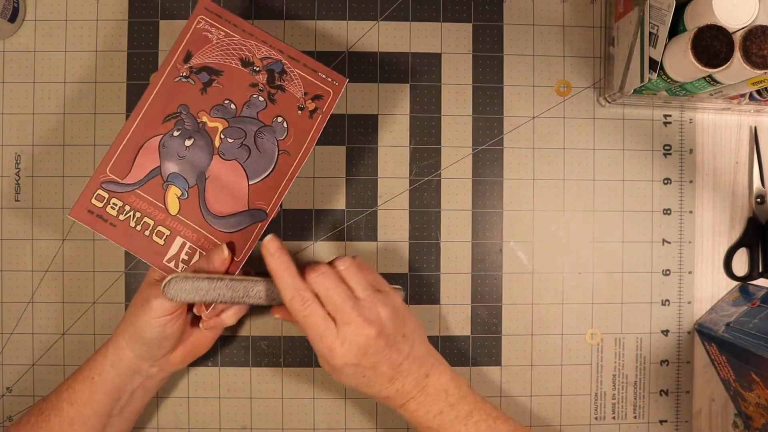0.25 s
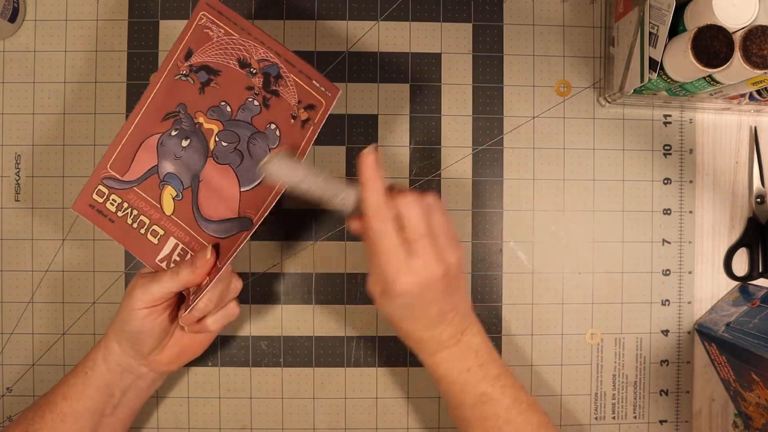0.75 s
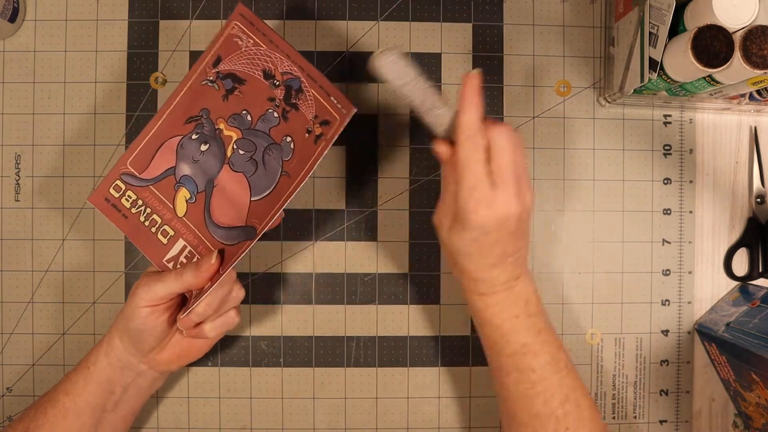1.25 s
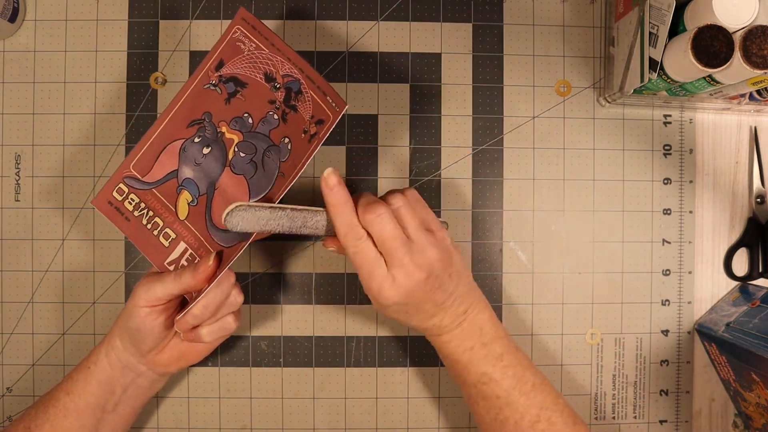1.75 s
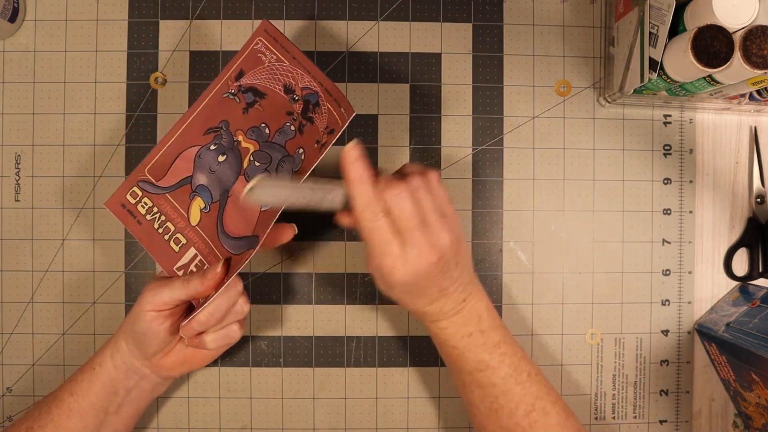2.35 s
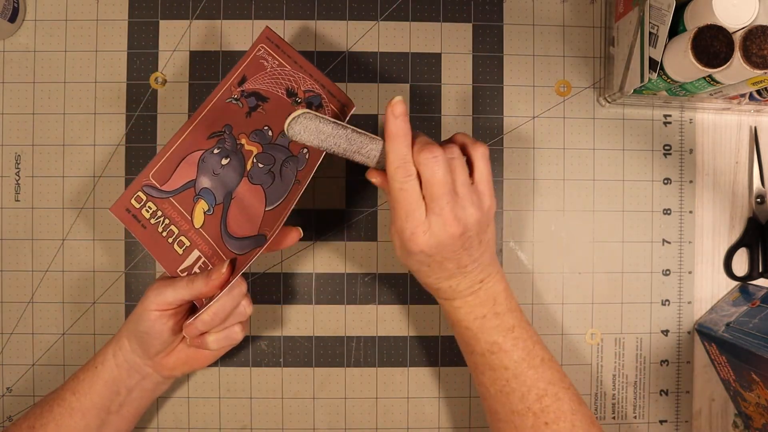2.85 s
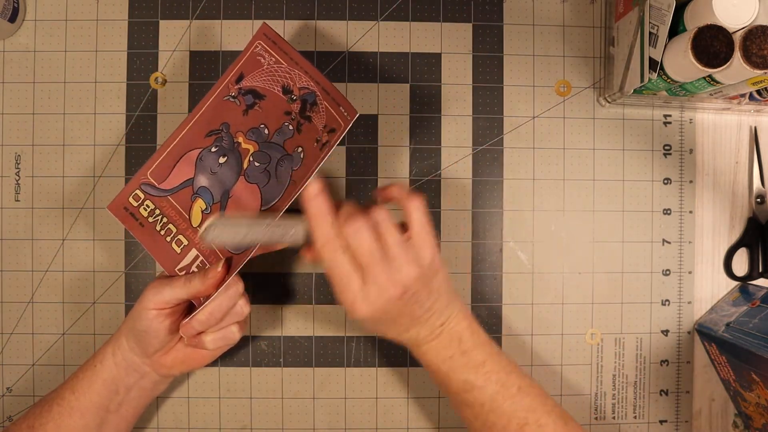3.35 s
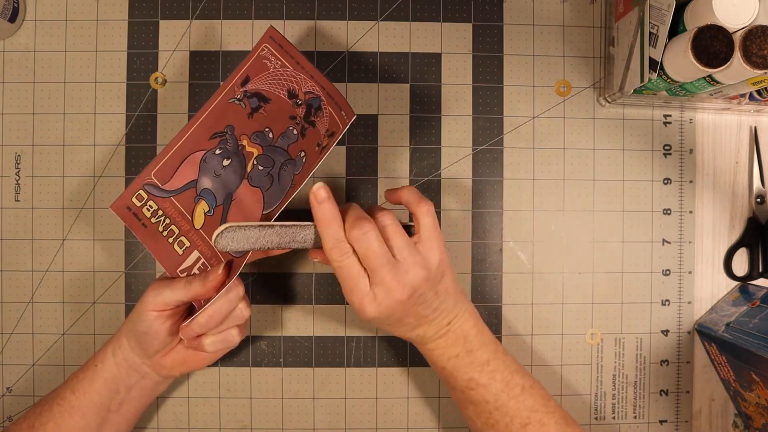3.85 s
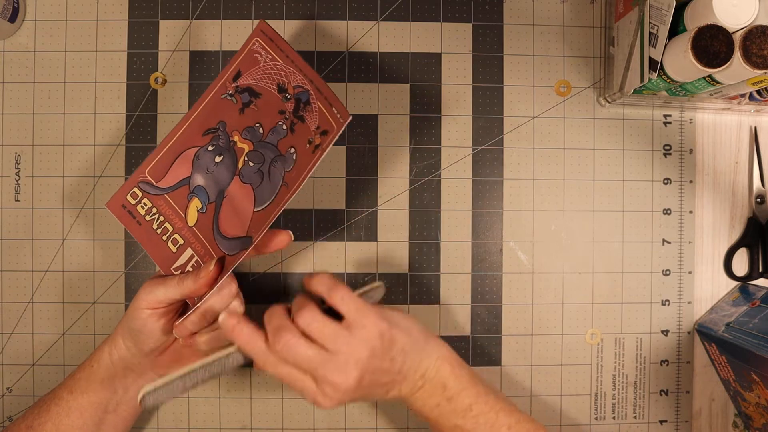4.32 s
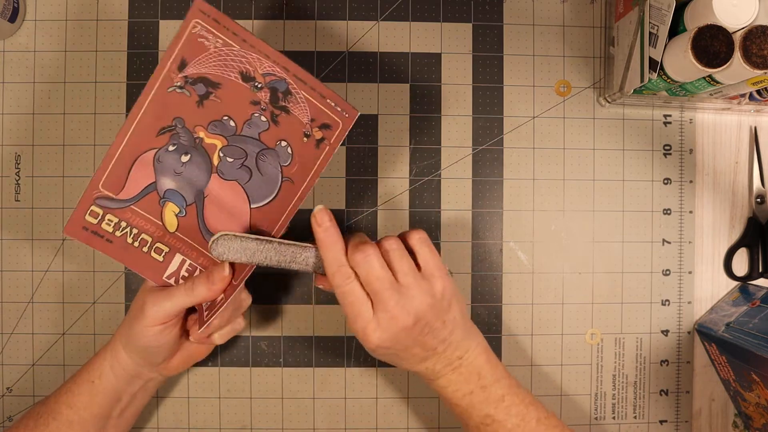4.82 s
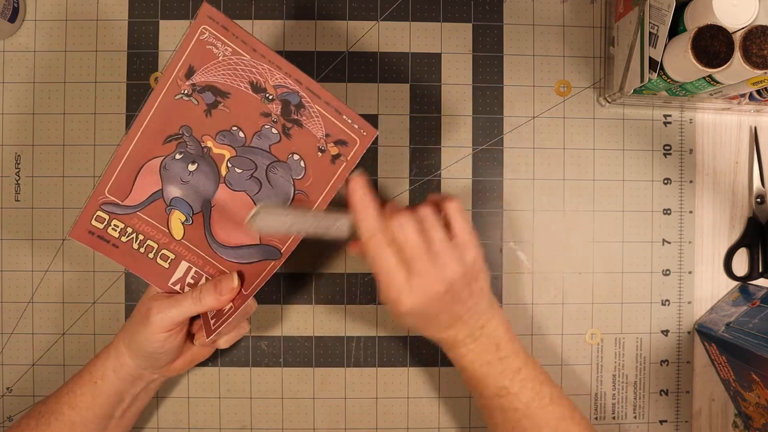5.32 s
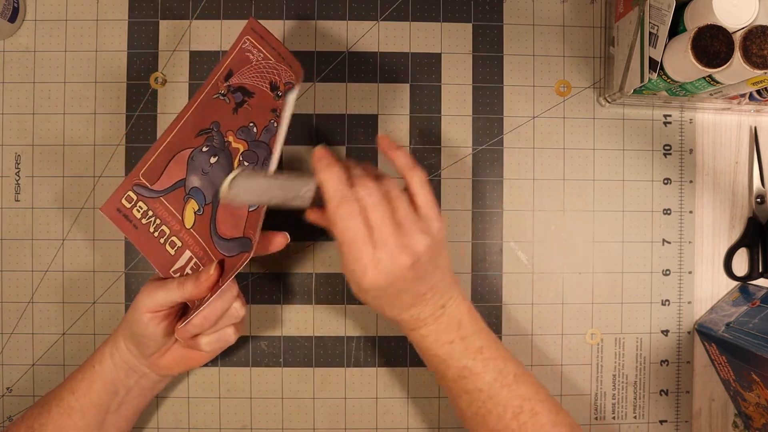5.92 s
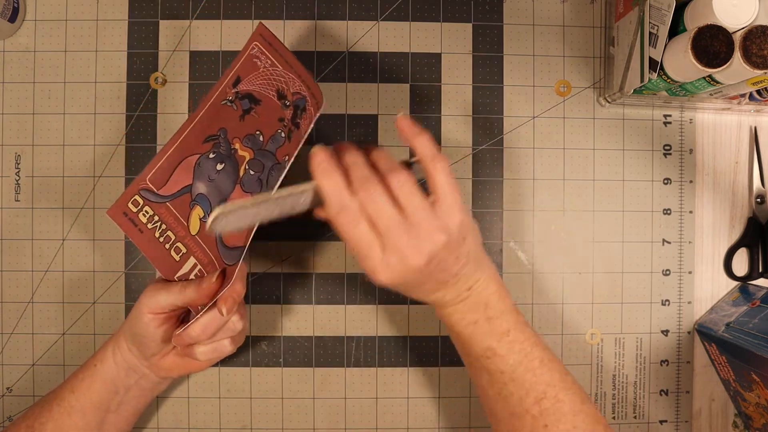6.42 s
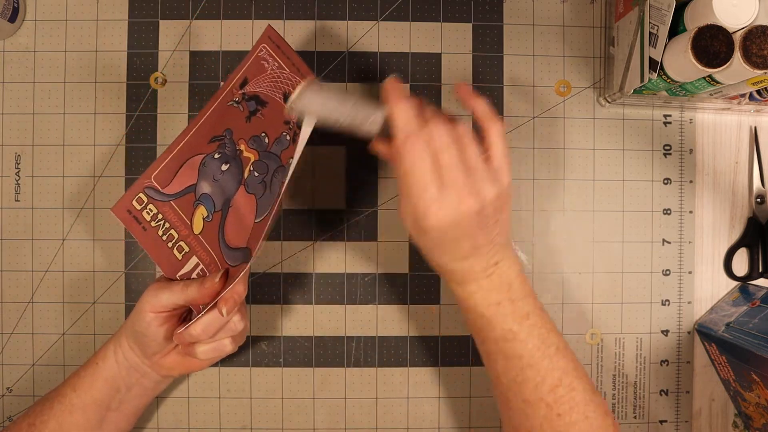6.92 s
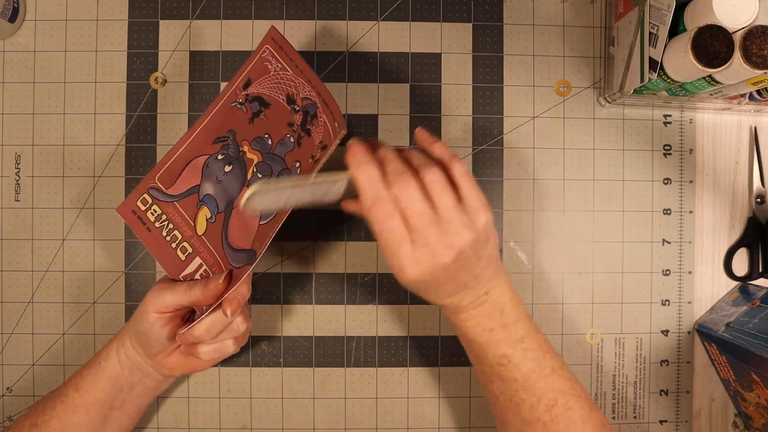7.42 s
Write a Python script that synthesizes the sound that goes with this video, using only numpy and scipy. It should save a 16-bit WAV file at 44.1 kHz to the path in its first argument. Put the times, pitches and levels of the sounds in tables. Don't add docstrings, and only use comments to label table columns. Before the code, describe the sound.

Very close, bright stereo sound of a nail file on the cut edge of a hand-held paper booklet, in a quiet, fairly dry room with faint hiss. A light papery knock at 0.05 seconds leads to soft grazing, then coarse scrapes from 0.4, one with a thin high squeak. A sharp snap lands at 0.9, another rasp at 1.1, and a softer knock at 1.3. From 1.55 to about 4.4 the file scrubs rapidly to and fro, gritty and hollow, quickening to roughly ten short strokes a second after 3.7. A half-second lull follows. At 4.9 a long rasp resumes, with knocks at 5.1 and 5.35 and a hard clack at 5.5. Slower, uneven strokes run from 5.7 to 7.0, ending in a loud slip-off slap and page flutter. After a pause, a light knock and short scrape come at 7.5.

```python
import sys
import numpy as np
from scipy import signal
from scipy.fft import rfft, irfft, next_fast_len
from scipy.io import wavfile

SR = 44100
rng = np.random.default_rng(int(sys.argv[2]) if len(sys.argv) > 2 else 0)


def dump(signal):
    limited = np.clip(np.atleast_2d(signal).T, -1, 1)
    pcm = np.round(limited * 32767).astype(np.int16)
    wavfile.write(sys.argv[1], SR, pcm)


N = 338247

# start in seconds, length in seconds, # early
# force in dB, late force in dB, cover flex in dB relative to the force.
STROKES = [(-0.02, 0.055, -38.5, -47.5, 11), (0.037, 0.044, -36, -33, 1),
           (0.065, .22, -45, -57.5, -4.5), (0.379, 0.19, -36.5, -27.5, -1.5),
           (0.577, 0.13, -29, -34, 0.5), (0.708, 0.19, -24.5, -21, -6.5),
           (1.138, 0.18, -24.5, -27.5, -4), (4.924, 0.21, -23, -36.5, -4.5),
           (5.36, 0.14, -23.5, -30.5, -7), (5.721, 0.13, -41, -44, 2.5), (5.867, 0.25, -38, -24, -4),
           (6.108, .11, -38.5, -36.5, -1.5), (6.24, 0.18, -39, -48, 2),
           (6.403, 0.23, -24, -25.5, -6.5), (6.667, .2, -29.5, -33, -5.5), (6.871, .163, -26, -21, -7),
           (7.473, 0.12, -31.5, -23, -0.5)]
MORE_STROKES = [(1.55, 0.16, -22, -25.5, -4), (1.718, 0.14, -31, -28, 0), (1.862, 0.11, -25.5, -30, -3),
                (1.967, 0.12, -24.5, -28, -2.5), (2.097, 0.11, -25.5, -30.5, -3),
                (2.2, 0.14, -25, -25, -4.5), (2.351, 0.17, -20.5, -29, -4),
                (2.552, 0.18, -19.5, -25.5, -5), (2.725, 0.21, -27, -20.5, -5),
                (2.95, 0.2, -23, -26, -5.5), (3.155, 0.18, -23.5, -23, -5), (3.346, 0.17, -25, -22, -6),
                (3.528, 0.14, -21.5, -25.5, -8.5), (3.67, 0.096, -20, -21.5, -6.5),
                (3.77, .092, -26, -24.5, -6), (3.86, 0.098, -23.5, -20.5, -4),
                (3.96, 0.09, -25.5, -25, -9), (4.05, 0.096, -20, -20, -6.5),
                (4.148, 0.087, -26, -27, -8.5), (4.236, 0.13, -18.5, -22.5, -8)]
SETTLES = [
    (1.317, 0.06, -49, -52, 6),
    (7.04, 0.075, -36, -52.5, 9),
]
# time in seconds, bite in dB.
FILE_ANGLE = [(0, 9), (.3, 0), (1.2, 1), (1.9, -2), (2.4, 3), (2.65, -2), (3.3, -0.5), (4.0, -2.5),
              (4.35, 1), (4.97, -3), (5.07, 15), (5.13, -9.5), (5.45, 7), (5.8, -2), (6.3, -2.5),
              (6.6, 0.5), (7.0, 0.5), (7.55, 4)]
# time in seconds, extra scrub in dB, extra flex in dB.
DIGS = [(.467, 9.5, 7), (.775, 4, -2), (.86, 0.5, 12), (1.165, 1, -6.5), (1.568, -1.5, 0.5), (1.615, 1, -5),
        (1.795, 5, 0), (2.02, -2, -4.5), (2.185, -1.5, 1), (2.4, 1.5, -7), (2.66, 5, -4), (2.85, 3, -3.5),
        (2.905, -5.5, 2), (3.18, -3.5, -5), (3.3, 0.5, 2), (3.36, 3, 7.5), (3.93, -3, -1), (3.625, 3, 3),
        (4.98, 4, 2), (5.97, 4.5, 7), (6.085, -1.5, -4.5), (6.195, 6, 11.5), (6.56, 1, 7.5), (6.91, 3, 1.5),
        (6.955, -2, -1.5), (7.012, 10, 4), (7.03, -17.5, 4.5), (7.53, -0.5, 7.5), (7.56, 3, -4.5)]
# frequency in Hz, width in Hz, level in dB.
FLEX_MODES = [(514, 40, -11.5), (683.4, 87.5, -4.5), (862, 230, -8), (1100, 90, 0), (1355, 170, -11.5)]
SCRUB_MODES = [(1590, 166, -1.5), (1853, 157, -1), (2010, 310, -5.5), (2375, 151, 2.5), (2530, 130, 2.5),
               (3130, 262, -6.5), (3477, 100, -5), (3903, 370, -7.5), (4587, 52, -7), (4574, 350, -11.5)]
BITE_MODES = [(5200, 1380, -1.5), (6204, 810, 1.5), (7320, 880, -3.5), (8140, 1200, -3.5),
              (9440, 2000, -6.5), (10860, 2200, -8)]
AIR_MODES = [(12900, 1100, -2), (14000, 1200, 0), (15000, 1000, 4)]
# frequency in Hz, width in Hz, level in dB.
CORNER_MODE = [(5380, 130, 0)]
# time of most song in seconds, level in dB.
CORNER_SONG = [
    (0.465, -24),
    (0.65, -38),
    (0.75, -26),
]
# time in seconds, snap in Hz, snap in dB, crack in dB,
# page stack in dB.
KNOCKS = [(0.051, 1970, -19, -11, -31.5), (0.377, 1650, -51, -23.5, -35.5), (0.899, 1590, -1.5, -10.5, -15),
          (1.133, 2530, -32, -23, -30.5), (1.318, 1590, -10, -32, -19), (1.549, 1720, -13.5, -37, -14),
          (4.872, 1650, -23, -54, -17), (5.139, 2070, -14, -16, -11), (5.351, 2176, -25.5, -16, -22),
          (5.371, 1650, -6.5, -9, -8.5), (5.506, 2090, 1.5, -5.5, -11.5), (5.731, 2020, -28, -54.5, -43.5),
          (7.042, 2180, -6.5, -5, -14), (7.477, 1950, -25, -34, -24.5)]
# frequency in Hz, level in dB, 60 dB decay in seconds.
KNOCK_MODES = [(300, -12, 0.028), (398, -12, 0.024), (713, -2, 0.024), (833, 4, 0.0097), (1130, -9, 0.065),
               (1360, -19.5, 0.0073), (1520, -17.5, 0.042), (2450, -7, 0.0064), (3100, -47, 0.016)]
# time in seconds, level in dB, frequency in Hz.
PUFFS = [
    (0.899, -34.5, 40.2),
    (7.022, -31, 88),
]
# frequency in Hz, width in Hz, level in dB.
PAGE_MODES = [(142, 184, -3), (221, 53, -4.5), (315.5, 59, 13.5), (400, 280, -13)]
# time in seconds, level in dB.
FLAPS = [(.1, -34.5), (.87, -38), (1.32, -35), (1.98, -49), (2.18, -41.5), (2.6, -42.5), (3.01, -46),
         (3.72, -53.5), (4.1, -47.5), (4.31, -52.5), (5.0, -39), (5.12, -39), (5.45, -34.5), (6.07, -47),
         (6.43, -44), (6.58, -38), (7.03, -33)]
# time in seconds, level in dB.
JOLTS = [
    (1.555, -54),
    (4.878, -42),
    (5.356, -35.5),
    (5.51, -30.5),
    (7.48, -32),
]
# delay in seconds, level in dB.
ECHOES = [(.0014, -7), (.0046, -9), (.0066, -6), (.0102, -12), (.0148, -15)]
# frequency in Hz, 60 dB decay in seconds.
ROOM_T60 = [(250, 0.083), (1000, 0.17), (4000, 0.13), (12000, 0.071)]
# frequency in Hz, level in dB.
WIDTH = [(60, -21.5), (110, -5), (200, -10), (380, -15), (700, -17), (1290, -6), (2380, 1), (4400, 3),
         (8120, 8), (15000, 7)]
# frequency in Hz, level in dB per Hz.
FLOOR_MID = [(12, -53.5), (20, -23), (77, -5), (156, -7), (263, -14), (419, -15), (455, -12), (9540, -40),
             (12900, -46), (14000, -42)]
FLOOR_SIDE = [(12, -48), (20, -33), (64, -22), (107, -8), (361, -5), (546, -7), (610, -6), (825, -10),
              (1030, -11), (1640, -13.5), (14500, -35.5)]
# frequency in Hz, level in dB.
MIC = [(20, 1), (120, 0), (11500, 0), (12600, -4), (14900, -6), (15600, -8), (15900, -28)]


def filing(force):
    slips = grit(13000, 2.2)
    flex = gain_of(1.0) * rung(force[0] * slips, FLEX_MODES, drift_db=1.8, drift_hz=9.4)
    scrub = gain_of(-2.5) * rung(force[1] * slips, SCRUB_MODES, drift_db=2.3, drift_hz=11)
    bite = gain_of(-1.0) * rung(force[2] * slips, BITE_MODES, drift_db=1.0, drift_hz=32.0)
    air = gain_of(-16) * rung(force[3] * slips, AIR_MODES, drift_db=3.5, drift_hz=8)
    song = swells(CORNER_SONG, rise_db_per_s=130, fall_db_per_s=150) * np.minimum(force[1] * 30, 1)
    corner = rung(song * slips, CORNER_MODE, drift_db=-3.5, drift_hz=25)
    return passed(flex, 334) + passed(scrub, 770) + passed(bite + corner, 5400) + passed(air, 11500)


def pressure():
    start_s, start_share, start_db = 0.017, 0.084, -25.5
    stop_s, stop_share, stop_db = 0.029, 0.069, -34
    bend = 2.36
    arch_db, flex_arch_db = 1.5, -4.5
    flex_slow = 0.74
    bite_start, bite_slow = 1.8, 2.07
    usual_db, bite_per_db = -24, 0.91
    bite_early_db, bite_late_db, settle_bite_db = -8.5, -7.0, -19
    air_early_db, air_s = 14.0, 0.04
    slip_s, slip_flex_db, slip_bite_db = 0.019, 6.5, 8
    force = np.zeros((4, N))
    for row in STROKES + MORE_STROKES + SETTLES:
        start, length, early_db, late_db, flex_db = row
        t = np.arange(max(-start, 0), length, 1 / SR)
        left = length - t
        rise = start_s + start_share * length
        fall = stop_s + stop_share * length
        slips_off = any(abs(start + length - knock[0]) < .012 for knock in KNOCKS)
        turns = not slips_off
        starting_db = start_db * np.clip(1 - t / rise, 0, 1) ** bend
        stopping_db = turns * stop_db * np.clip(1 - left / fall, 0, 1) ** bend
        slow_db = starting_db + stopping_db
        arch = np.sin(np.pi * t / length)
        travel = np.clip((t - rise) / (length - rise - fall * turns + 1e-3), 0, 1)
        slip = slips_off * np.clip(1 - left / slip_s, 0, 1)

        push = early_db + (late_db - early_db) * travel + arch_db * arch
        flex = push + flex_db + flex_arch_db * arch + flex_slow * slow_db + slip_flex_db * slip
        scrub = push + slow_db
        bite = usual_db + bite_per_db * (push - usual_db)
        bite = bite + bite_start * starting_db + bite_slow * stopping_db
        bite = bite + bite_early_db + (bite_late_db - bite_early_db) * travel
        bite = bite + settle_bite_db * (row in SETTLES) + slip_bite_db * slip
        bite = bite + np.interp(start + t, *np.transpose(FILE_ANGLE))
        air = bite + air_early_db * np.exp(-t / air_s)

        edge = np.clip(np.minimum(t, left) / 0.0019, 0, 1)
        for zone, db in zip(force, (flex, scrub, bite, air)):
            add(zone, start, edge * gain_of(db))
    return force * digs() * gain_of(.8 * wander(45))


def digs():
    t = np.arange(N // 64 + 2) * 64 / SR
    s, scrub_db, flex_db = np.transpose(DIGS)
    bump = np.exp(-((t[:, None] - s) / 0.019) ** 2)
    zones_db = (flex_db, scrub_db, scrub_db, 0 * s)
    return gain_of([np.interp(np.arange(N) / SR, t, bump @ db) for db in zones_db])


def grit(slips_per_s, spread_db):
    draw = rng.random((N, 3))
    size = gain_of(-spread_db * np.log(draw[:, 0] + 0.0014))
    sign = np.sign(draw[:, 1] - .5)
    return evened(size * sign * (draw[:, 2] < slips_per_s / SR))


def rung(drive, modes, drift_db, drift_hz):
    t = np.arange(1500) / SR
    rings = []
    for k, (hz, width, db) in enumerate(modes):
        decay = width * np.exp(-np.pi * width * t)
        rings.append((-1) ** k * gain_of(db) * decay * np.sin(2 * np.pi * hz * t))
    sound = np.zeros(N)
    for ring in rings:
        fed = drive * gain_of(drift_db * wander(drift_hz))
        sound = sound + signal.oaconvolve(fed, ring)[:N]
    return sound / np.linalg.norm(sum(rings))


def knocks():
    out, t = np.zeros(N), np.arange(3000) / SR
    rings = np.array([gain_of(db - 60 * t / t60) * np.sin(2 * np.pi * hz * t) for hz, db, t60 in KNOCK_MODES])
    rise = 1 - np.exp(-t / .00025)
    crack_band = signal.butter(2, [2500, 4200], "band", fs=SR)
    for s, snap_hz, snap_db, crack_db, stack_db in KNOCKS:
        hiss = rng.standard_normal(len(t))
        spot = gain_of(1.5 * rng.standard_normal(len(rings)))
        snap = gain_of(-60 * t / .0055) * np.sin(2 * np.pi * snap_hz * t)
        rebound = .6 * np.roll(snap, round(.0016 * SR))
        snap = gain_of(snap_db + 8) * (snap + rebound)
        crack = gain_of(crack_db + 1 - 60 * t / 0.017) * signal.lfilter(*crack_band, hiss)
        stack = gain_of(stack_db + 5.0) * spot @ rings
        rattle = gain_of(-29.5 - 60 * t / 0.074) * hiss * (abs(hiss) > 2.2)
        chatter = signal.oaconvolve(stack + crack + 0.086 * snap, rattle)[:len(t)]
        body = rise * (stack + snap + crack) + chatter
        body = body - .7 * passed(body, 5000)
        add(out, s + 0.00191, gain_of(-3.0) * passed(body, 360))
    for s, db, hz in PUFFS:
        add(out, s, gain_of(db) * np.sin(2 * np.pi * hz * t) * np.exp(-t / .012))
    return out


def grip(force):
    held, shaken = gain_of(-59.5), gain_of(-21) * force[0]
    flaps = swells(FLAPS, rise_db_per_s=264, fall_db_per_s=317)
    jolts = swells(JOLTS, rise_db_per_s=3988, fall_db_per_s=302.5)
    drive = (held + shaken + flaps + jolts) * gain_of(-4.5) * grit(1500, 4.4)
    return passed(rung(drive, PAGE_MODES, drift_db=4.0, drift_hz=9.2), 110)


def room(x, early_db, late_db):
    taps = np.zeros(SR // 2)
    at = np.arange(500, len(taps) - 12, 12)
    taps[at + rng.integers(0, 12, len(at))] = rng.choice([-1., 1.], len(at))
    hz, t, z = signal.stft(taps, SR, nperseg=256)
    decay = gain_of(-60 * t / read(ROOM_T60, hz)[:, None])
    tail = signal.istft(z * decay, SR, nperseg=256)[1]
    path = gain_of(late_db) * tail / np.linalg.norm(tail)
    for s, db in ECHOES:
        path[round(s * SR * rng.uniform(.93, 1.07))] += gain_of(db + early_db)
    return signal.oaconvolve(x, path)[:N]


def floor(points, db):
    return gain_of(db + 0.3 * wander(3)) * evened(coloured(rng.standard_normal(N), points))


def swells(events, rise_db_per_s, fall_db_per_s):
    t = np.arange(N // 64 + 2) * 64 / SR
    slopes = [db + np.minimum(rise_db_per_s * (t - s), fall_db_per_s * (s - t)) for s, db in events]
    return np.interp(np.arange(N) / SR, t, gain_of(np.max(slopes, axis=0)))


def wander(hz):
    steps = rng.standard_normal(N // 256 + 2)
    smooth = signal.filtfilt(*signal.butter(2, np.clip(hz * 512 / SR, .01, .9)), steps)
    return np.interp(np.arange(N) / 256, np.arange(len(steps)), evened(smooth))


def coloured(x, points, turn=0.):
    size = next_fast_len(len(x))
    gain = gain_of(read(points, np.fft.rfftfreq(size, 1 / SR)))
    return irfft(rfft(x, size) * gain * np.exp(1j * turn), size)[:len(x)]


def passed(x, hz):
    return signal.lfilter(*signal.butter(2, hz, "high", fs=SR), x)


def gain_of(db):
    return 10 ** (np.asarray(db) / 20)


def evened(x):
    return x / np.sqrt(np.mean(x ** 2) + 1e-20)


def read(points, hz):
    f, value = np.transpose(points)
    return np.interp(np.log(hz + 1), np.log(f + 1), value)


def add(mix, s, sound):
    part = mix[max(round(s * SR), 0):][:len(sound)]
    part += sound[:len(part)]


def scene():
    force = pressure()
    work = filing(force) + knocks() + grip(force)
    mid = work + room(work, early_db=-9.5, late_db=-26)
    far_face = gain_of(-3.5) * filing(force)
    side = gain_of(-3.0) * work + far_face + room(work, early_db=-9, late_db=-21)
    side = coloured(side, WIDTH, turn=1.27)
    mid = mid + floor(FLOOR_MID, -54.5)
    side = side + floor(FLOOR_SIDE, -52)
    return np.array([mid + side, mid - side])


def top_cut(x):
    return signal.sosfilt(signal.butter(12, 15600, fs=SR, output="sos"), x)


def record(dry):
    heard = np.array([coloured(port, MIC) for port in dry])
    return top_cut(np.clip(heard, -1, 1))


dry = scene()
out = record(dry)
dump(out)
```